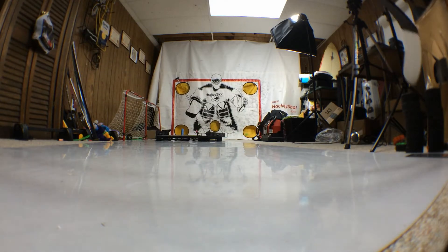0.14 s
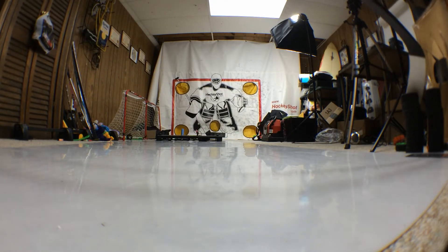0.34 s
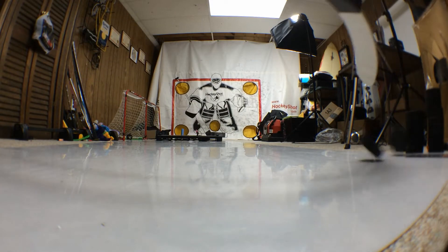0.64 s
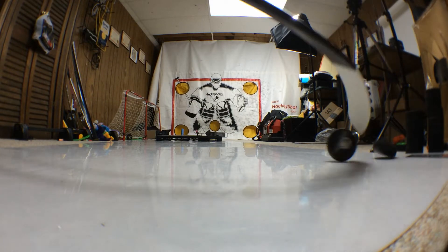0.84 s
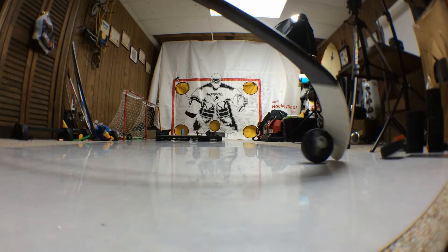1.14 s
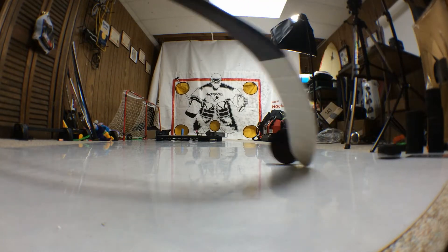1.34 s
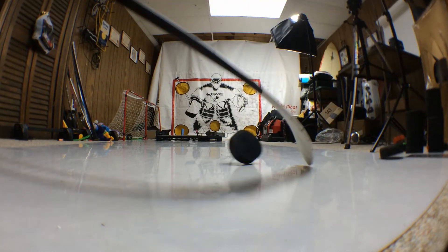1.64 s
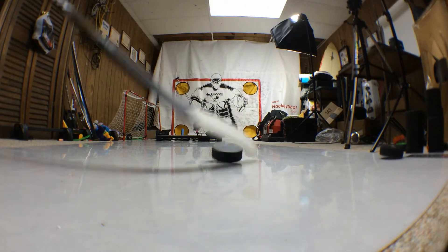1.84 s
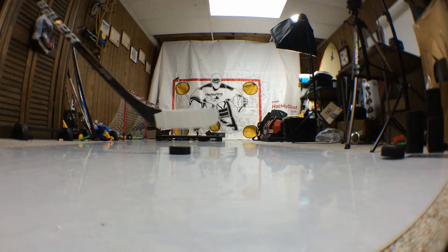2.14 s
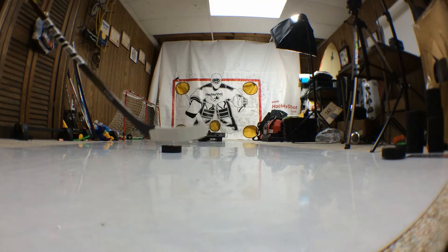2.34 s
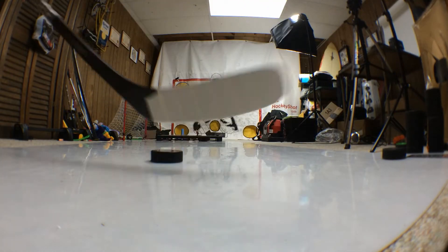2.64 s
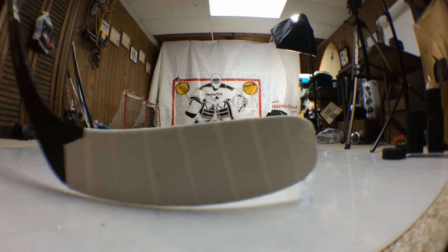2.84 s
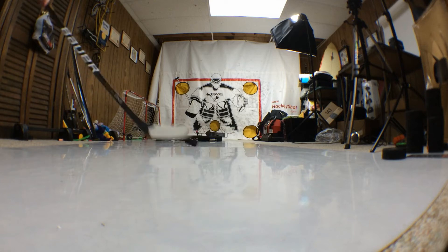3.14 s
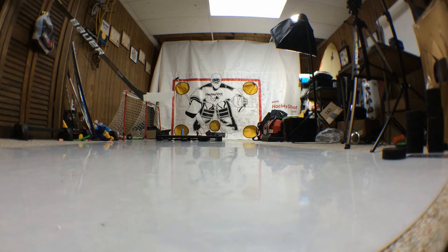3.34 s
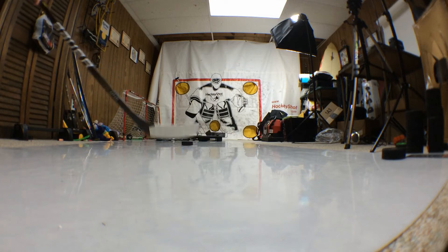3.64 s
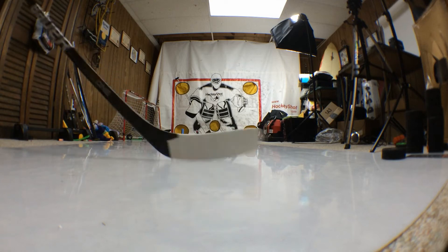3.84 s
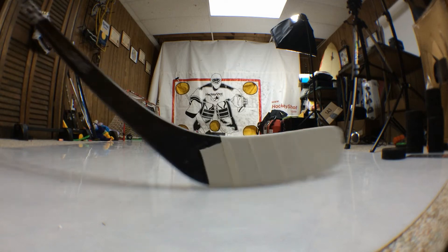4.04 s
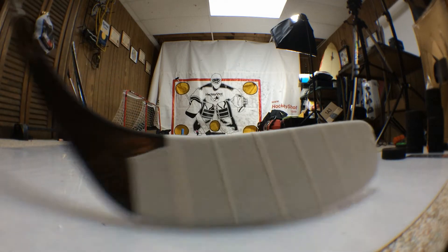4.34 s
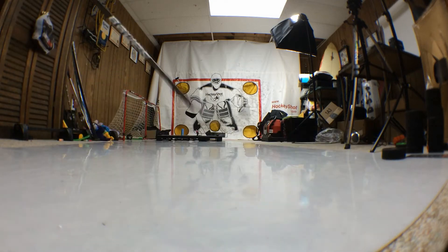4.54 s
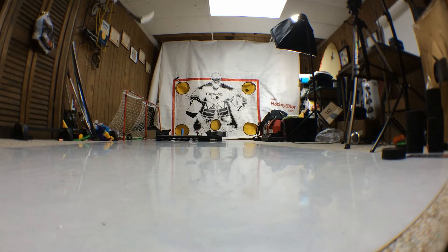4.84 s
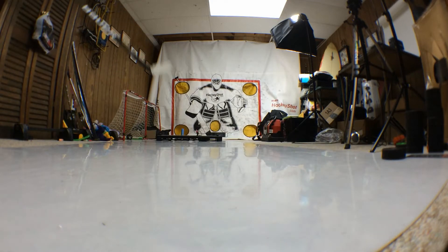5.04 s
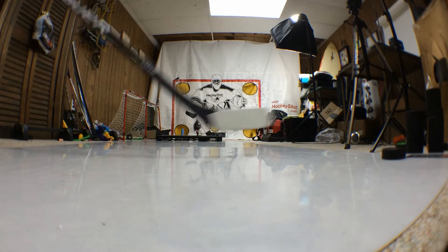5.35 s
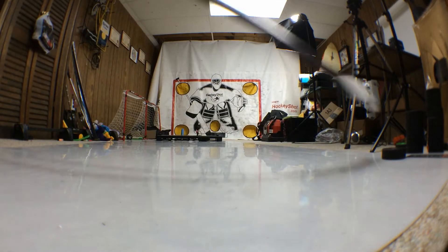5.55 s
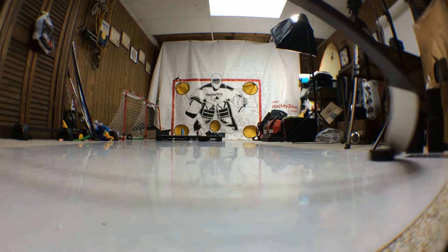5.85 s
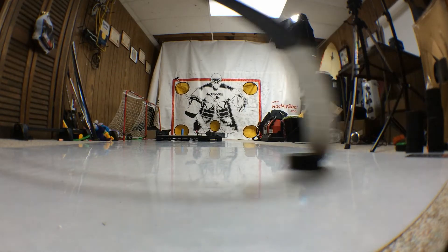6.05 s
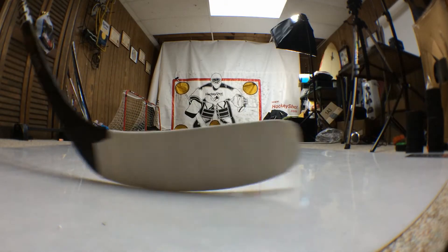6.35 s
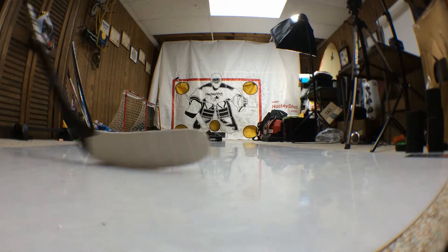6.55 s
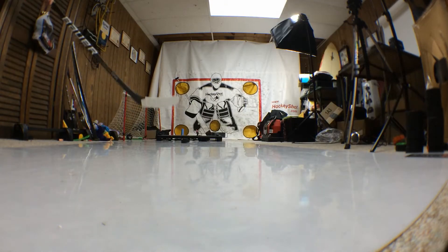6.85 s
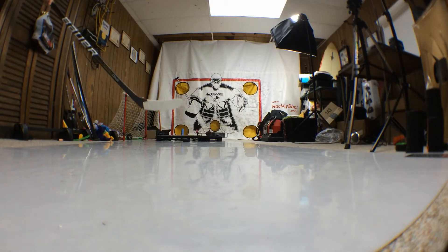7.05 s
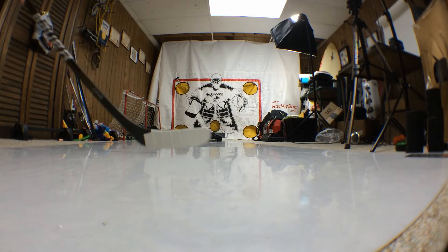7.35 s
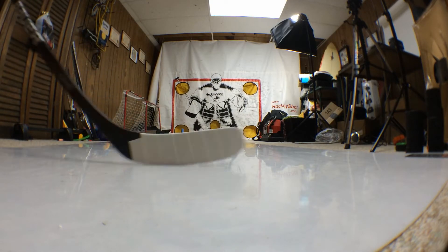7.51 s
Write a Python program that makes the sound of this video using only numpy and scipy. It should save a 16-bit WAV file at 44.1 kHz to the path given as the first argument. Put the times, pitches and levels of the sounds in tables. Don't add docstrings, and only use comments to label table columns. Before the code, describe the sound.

A puck hops in on a hard indoor floor, is tapped and dragged by a stick, then two shots clatter dully into a goal.

```python
import sys
import numpy as np
from scipy import signal
from scipy.fft import rfft, irfft
from scipy.io import wavfile
from scipy.ndimage import uniform_filter1d

SR = 44100
rng = np.random.default_rng(int(sys.argv[2]) if len(sys.argv) > 2 else 0)


def transcribe(u):
    v = np.clip(np.atleast_2d(u).T, -1, 1)
    q = np.round(v * 32767).astype(np.int16)
    wavfile.write(sys.argv[1], SR, q)


def linear_from_db(decibels):
    return 10 ** (np.asarray(decibels, float) / 20)


N = 338688

# f/Hz, density/dB
HISS_SPECTRUM = [(25, -25), (60, 0), (100, -0.5), (200, -0.5), (400, -3), (800, -7), (1400, -9.5),
                 (2200, -16), (3200, -18.5), (5000, -21), (6300, -19), (8000, -22), (10000, -24),
                 (12500, -28.5)]
HISS_DB = -71.5
CLOCK_PERIOD_S, CLOCK_START_S, CLOCK_DB = 0.1024, 0.0558, -66
CASE_HZ = 2300
ROOM_T60_S, ROOM_DB = 0.42, -27

# f/Hz, density/dB
AIR_SPECTRUM = [(1200, 3), (1800, 5), (2300, -4), (3000, -15.5), (4000, -20.5), (5500, -26), (7000, -26.5),
                (9000, -33), (12500, -52)]
# t/s, peak level/dB, t60/s
AIR_CRACKS = [(0.6295, -48.5, 0.22), (0.6774, -52, 0.18), (0.775, -66, 0.1), (0.8225, -56, 0.037),
              (1.081, -49, 0.044), (1.29, -57, 0.17), (1.893, -60, 0.4), (2.419, -49, 0.16),
              (2.824, -41.5, 0.013), (2.9706, -34, 0.17), (3.142, -63, 0.064), (4.1204, -40.5, 0.08),
              (4.5402, -85, 0.11), (4.78, -73, 0.11), (4.789, -61, 0.11), (5.4, -58, 0.14),
              (5.7782, -43, 0.15), (6.2852, -48, 0.032), (6.49, -51, 0.063)]
# t/s, level/dB, hold/s, t60/s
EDGE_SNAPS = [(0.254, -77, .002, .03), (0.626, -74, .002, 0.018), (.676, -74, .002, .02),
              (.8212, -69, 0.0019, .02), (2.823, -65.5, .001, 0.019), (2.973, -72, 0.0011, 0.023),
              (3.414, -77.5, .002, .04), (5.4, -72, 0.021, 0.059), (5.777, -64, 0.00081, .02),
              (6.295, -69, .001, 0.019), (7.003, -75.5, 0.01, .05)]
# f/Hz, density/dB
SNAP_SPECTRUM = [(2000, -31), (3500, 0), (4500, 1.5), (8500, -5), (11000, -20)]

# t/s, level/dB, hold/s, t60/s, air leak level/dB
RATTLES = [(0, -72, 0.017, .1, -10), (0.255, -77, .02, .1, -12), (3.351, -63, .006, 0.046, -29),
           (3.364, -42, 0.014, 0.17, -27), (3.462, -71.5, 0.06, 0.3, -9), (3.409, -47.5, 0.044, 0.1, -17),
           (4.514, -63, .004, 0.072, -38), (4.546, -57.5, 0.0029, 0.2, -19),
           (4.778, -34.5, 0.015, 0.17, -24.5), (5.396, -55, 0.022, 0.12, -19.5),
           (6.985, -65, 0.033, 0.12, -18), (7.043, -69.5, 0.025, 0.16, -7.5),
           (0.675, -55, 0.0091, 0.1, -36), (1.28, -54, 0.014, 0.075, -29),
           (1.891, -47.5, 0.0085, 0.088, -33), (2.411, -56, 0.0088, 0.26, -33), (2.983, -50, .01, 0.1, -26),
           (4.13, -54, 0.0088, 0.13, -30), (5.775, -48.5, .01, 0.12, -30.5), (6.487, -54, 0.008, 0.17, -29)]
# f/Hz, density/dB
RATTLE_SPECTRUM = [(400, -26.5), (600, -1), (1000, 10), (1300, 5.5), (1650, 2.5), (2000, -16.5),
                   (2600, -18.5), (3300, -58)]

# t/s, length/s, level/dB, weight as bass level/dB, speed as treble level/dB
STROKES = [(0.62, 0.15, -81, -7, -17), (0.974, 0.57, -63.5, 4.5, -29), (1.54, 0.39, -56.5, -5, -20.5),
           (2.001, 0.48, -55, -3, -24), (2.548, 0.29, -67, -23, -21), (2.95, 0.15, -66, -8, -16.5),
           (3.128, 0.27, -74.5, -1, -13), (3.5, 0.44, -71.5, 4.5, -13), (3.78, 0.68, -65, -36, -10.5),
           (4.479, 0.16, -68, -12.5, -5), (4.801, 0.093, -65.5, 2, -19), (5.02, 0.29, -88.5, 10, 2.5),
           (5.8, .2, -70.5, -17, -10.5), (5.947, 0.52, -61.5, -43.5, -12), (6.52, 0.49, -73.5, -0.5, -13.5),
           (7.07, 0.091, -74, 20, -2.5), (7.204, 0.44, -73, -2.5, -12)]
STROKE_ATTACK_S, STROKE_T60_S = 0.09, 0.2

# t/s, level/dB, f/Hz, swell/s, t60/s
FRAME_RINGS = [(0.247, -50.5, 91.5, 0.017, 0.22), (.64, -38, 65.3, .02, 0.3),
               (0.687, -27.5, 137.5, 0.014, 0.2), (.79, -47, 59.7, 0.023, 0.089),
               (1.409, -40, 63.4, .02, 0.12), (2.822, -16, 70.2, 0.0019, 0.072),
               (2.969, -40, 55.3, 0.038, 0.23), (3.1, -56, 47, 0.065, 0.36),
               (3.469, -46, 135.7, 0.096, 0.87), (3.5, -56.5, 61.6, 0.062, 0.41),
               (4.125, -37.5, 65, 0.025, 0.2), (4.18, -35.5, 136.3, 0.018, 0.18),
               (4.784, -24.5, 65.7, 0.011, 0.17), (4.79, -27.5, 94.5, 0.0066, 0.25),
               (4.785, -17, 205, 0.0034, 0.14), (4.786, -29, 260, 0.0068, 0.16),
               (5.396, -42.5, 276.6, 0.0033, 0.11), (6.494, -22, 554, 0.0036, 0.057),
               (4.782, -15.5, 405, 0.0034, 0.05), (6.29, -32.5, 66, 0.019, 0.16),
               (7.079, -53, 350, .03, 1.9), (7.12, -55, 310, .03, 0.96), (7.48, -67, 572, .03, 1.85),
               (7.15, -52, 133.8, 0.1, 2)]
# t/s, level/dB, f/Hz, swell/s, t60/s
TILE_NOTES = [(0, -47, 285, 0.0024, 0.083), (.257, -65, 2720, .002, 0.043), (.345, -59, 480, .003, 0.081),
              (.483, -70, 2720, 0.0022, 0.046), (.7, -30, 140, .01, 0.16), (.845, -42, 136.3, .01, 0.23),
              (2.84, -37.5, 126.5, .01, 0.37), (2.98, -27, 140, 0.0045, 0.16),
              (2.982, -37, 730, .003, 0.087), (3.383, -28.5, 459, .006, 0.097),
              (3.51, -23.5, 336.6, 0.0077, 0.095), (3.764, -37, 560, 0.003, 0.05),
              (4.1205, -18.5, 262, 0.0034, 0.049), (4.812, -21, 221, .008, 0.12),
              (4.81, -38, 590, .005, 0.093), (4.655, -54, 384.5, 0.015, 0.14),
              (5.395, -45.5, 1171, .002, 0.076), (5.408, -48, 1547, 0.0027, 0.055),
              (5.4, -50, 250, .004, 0.12), (5.7785, -33.5, 1682, .0015, 0.052),
              (5.779, -32, 990, .002, 0.045), (5.786, -24.5, 368, 0.0016, 0.034),
              (5.787, -29.5, 571, 0.0011, 0.054), (5.797, -34, 177.5, .005, 0.09),
              (6.289, -18.5, 551, .002, 0.047), (6.3, -41.5, 137, .008, 0.24),
              (6.986, -31, 401, 0.0053, 0.067), (7.03, -52, 287, .006, 0.086),
              (7.066, -33, 351.3, .008, .12), (7.453, -30.5, 435, 0.0026, 0.034),
              (.632, -26.5, 432, 0.0019, 0.038), (.676, -29, 507, 0.002, .04),
              (.776, -33, 480, 0.0022, 0.037), (3.353, -42, 310, 0.0069, .06),
              (4.126, -39.5, 328, .002, 0.073), (4.19, -50, 568, 0.0083, 0.13),
              (4.779, -24, 1123, 0.0021, 0.066), (4.79, -29.5, 874, .003, .06),
              (3.146, -30.5, 521, 0.0052, 0.07), (2.8235, -19.5, 310, 0.0017, 0.041)]
# t/s, level/dB, f/Hz, swell/s, t60/s
MORE_NOTES = [(.343, -62, 1900, .001, .04), (.431, -59, 950, .001, 0.062), (1.288, -49, 1665, .002, 0.046),
              (1.352, -34, 140, .004, .08), (1.894, -42, 1400, .001, .04), (2.8235, -18, 395, 0.0025, .04),
              (2.824, -37, 1240, .0015, 0.036), (2.83, -30, 100.4, .005, .12),
              (4.794, -23, 306, .005, 0.13), (4.864, -36, 190, 0.0065, 0.091),
              (5.985, -52, 428.6, .008, 0.12), (6.288, -44, 1750, .001, 0.026),
              (6.4925, -27, 1550, .001, 0.024), (6.51, -38, 258, 0.0037, 0.05)]

# f/Hz, level/dB, t60/s
TILE_MODES = [(92, -8.5, 0.029), (109, -8, 0.062), (140, 5, 0.15), (181.5, 2.5, 0.12), (205, -1, 0.21),
              (262, -8, 0.23), (315, -1.5, 0.12), (368, 1, 0.072), (411.3, 0, 0.096), (455.8, -1.5, 0.13),
              (511, 0.5, 0.068), (569.3, 1.5, 0.12), (680, -17, 0.018), (708.5, -5, 0.11),
              (801.4, -5, 0.095), (904.6, 9, 0.016), (1077, 4.5, 0.019), (1144, 2, 0.064),
              (1223, 10, 0.027), (1340, -9, 0.091), (1550, -0.5, 0.042), (1565, -3, 0.07),
              (2073, -22.5, .04), (2100, -18, 0.013), (2690, -30.5, 0.018)]
# f/Hz, level/dB, t60/s
GOAL_MODES = [(150, 9, 0.3), (205, -1.5, 0.26), (256, 5, 0.083), (285, -6, 0.038), (328, 8, 0.21),
              (310, -12, 0.44), (364, 9, 0.038), (442, -6, 0.2), (542, -4.5, 0.086), (694, -42, 0.12),
              (980, -33, 0.044), (1420, 3, 0.044), (1740, 1.5, 0.065)]
GOAL_OTHER_CORNER_HZ = [139.8, 205, 240, 290, 349.6, 310, 377, 439, 560, 694, 980, 1404, 1740]

# t/s, peak level/dB, bass level/dB, treble level/dB
PUCK_CATCHES = [(1.564, -47, -14, -16), (1.64, -48, -22, -32), (1.777, -39, -20, -22),
                (1.925, -40.5, -9, -20), (1.977, -48, -20, -19), (2.08, -39.5, -15, -32),
                (2.156, -41, -15.5, -19), (2.229, -52, -20, -30), (2.291, -36.5, -20, -35),
                (2.311, -45, -27, -19), (2.398, -40, -22, -30), (2.446, -36.5, -4.5, -22),
                (2.526, -55.5, -4, -16), (3.796, -39.5, -21.5, -25.5), (3.866, -46, -22, -25),
                (4.027, -55, -27, -15), (4.066, -67.5, -20, -21), (4.089, -60, -19.5, -20),
                (4.19, -52, -27, -25), (4.251, -45, -31, -22), (4.61, -60, -20, -13.5),
                (4.66, -65, -19, -27), (2.986, -31, -5.5, -25), (3.004, -34, -1.5, -7),
                (6.515, -43, -9, -16), (1.351, -30.5, -9, -32), (2.6, -57, -25, -27),
                (2.648, -60, -21.5, -28), (2.698, -48.5, -30, -27), (2.757, -52, -24.5, -27),
                (6.2, -48, -31.5, -18)]
# t/s, peak level/dB, bass level/dB, treble level/dB, ring stretch/ratio
PUCK_IN_GOAL = [(3.314, -52, -9, -18, 1.9), (3.363, -18, -28, -26, 0.26), (3.378, -27, -21.5, -31, 1.2),
                (3.411, -26.5, -30, -9, 0.37), (3.425, -20, -18.5, -25, 0.46),
                (3.443, -26.5, -39, -14, 0.72), (3.469, -31.5, -7, -34, 0.99),
                (3.511, -38.5, -7, -34.5, 1.3), (3.578, -48, -5, -12, 1.7), (6.75, -54, -19, -34.5, 1.3),
                (6.803, -54.5, -16, -10.5, 2), (6.905, -56.5, -12.5, -23, 1.4),
                (6.992, -36, -9.5, -13, 0.67), (7.031, -38, -8, -32, 1.9), (7.065, -33.5, -6.5, -39, 0.8),
                (7.077, -31, -15, -22.5, 1.1), (7.098, -40, -3, -22.5, 0.5), (7.14, -49.5, -5, -38, 0.38),
                (7.165, -49.5, -11, -16.5, 1.7)]
# t/s, peak level/dB, bass level/dB, treble level/dB
PUCK_HOPS = [(0.634, -14, -12, -20.5), (0.681, -16, -12.5, -17), (0.7795, -16.5, -15.5, -27),
             (0.8255, -21, -7, -16), (0.934, -38, -12, -20.5), (0.972, -29.5, -18, -29.5),
             (1.036, -34, -17, -21), (1.081, -22.5, -12.5, -15), (1.117, -31.5, -14, -28),
             (1.174, -63, -11, -34), (1.245, -38.5, -11, -23), (1.28, -33, -15, -19),
             (1.34, -25.5, -11, -23), (1.4085, -25, -20, -19)]
# t/s, peak level/dB, bass level/dB, treble level/dB
BLADE_NUDGES = [(1.467, -40.5, -11, -22), (1.503, -40, -15, -41), (1.582, -31, -16, -32),
                (1.614, -41, -4, -27), (1.662, -38, -23, -38), (1.706, -32, -29, -21.5),
                (1.753, -37, -7, -48), (1.84, -39, -27, -52), (1.896, -28, -16.5, -12.5),
                (1.996, -27, -8, -29), (2.05, -35.5, -14, -26), (2.114, -40, -10, -23),
                (2.206, -38, -27, -43), (2.278, -42, -52, -40), (2.338, -39, -28, -29),
                (2.37, -48, -15, -13), (2.417, -26.5, -12.5, -4.5), (2.481, -31, -16, -27)]
# t/s, peak level/dB, bass level/dB, treble level/dB
SHOT_BLOWS = [(2.8245, -15, -10, -14), (2.893, -26.5, -20, -23.5), (3.148, -30.5, -19.5, -18.5),
              (3.762, -29, -21, -14), (3.836, -45.5, -12.5, -24.5), (3.892, -28.5, -17.5, -26.5),
              (3.996, -47, -42, -7), (4.152, -27, -16, -30), (4.316, -71, -26, -27),
              (4.379, -56, -31.5, -5), (4.434, -50, -19.5, -15), (4.473, -51, 1, -12),
              (4.517, -47.5, -15.5, -3.5), (4.794, -27.5, 3.5, -13), (4.819, -26.5, 1, -22)]
# t/s, peak level/dB, bass level/dB, treble level/dB
DRAG_BLOWS = [(5.995, -43.5, -44.5, -20), (6.024, -50, -19, -18), (6.06, -41.5, -26, -18.5),
              (6.148, -46, -36, -16), (6.196, -50, -23.5, -15), (6.229, -35.5, -29, -14),
              (6.259, -53.5, -1, -2), (6.287, -13, -13.5, -15), (6.358, -47.5, -9, -23),
              (6.391, -55, -24, -11), (6.414, -39.5, -39, -15), (6.453, -40.5, -33, -17.5),
              (6.706, -29.5, -23.5, -19.5), (7.452, -36, -15.5, -34)]
# t/s, peak level/dB, bass level/dB, treble level/dB, travel at 500 Hz/ms
CLOSE_SLAPS = [(0, -57, -7, -3, 2.4), (0.253, -57, 5, -11, 6.2), (0.3409, -54, -6, -3.5, 1.3),
               (0.429, -62, 1.5, 6, 1.8), (.462, -57.5, -26, -1, 2.3), (2.968, -14, -21.5, -0.5, 1.58),
               (4.118, -21, -9.5, -1.5, 1.25), (4.538, -43, -7.5, 4.5, 2.1),
               (4.777, -25, -6.5, -14.5, 1.66), (4.784, -19.5, 3.5, -14, 4.4), (5.396, -53, 5, 4, 1.07),
               (5.779, -45, -10, 6.5, 2.16), (6.49, -25.5, -14, 0.5, 1.38)]

HOP_MS, DRIBBLE_MS, SHOT_MS, GOAL_MS, CATCH_MS = 8.15, 7.7, 4.8, 5.88, 4.7
HOP_RING, DRIBBLE_RING, SHOT_RING, SLAP_RING, CATCH_RING = 0.95, 1, 0.7, 0.82, 0.85
HOP_BODY_DB, DRIBBLE_BODY_DB, SHOT_BODY_DB = -1, -2, 4.5
DRAG_BODY_DB, SLAP_BODY_DB, CATCH_BODY_DB = -5.5, 2.5, 0
CHOKE_DB_PER_DB = 0.15


def coloured(points):
    hz, db = np.transpose(points)
    log_hz = np.log(np.fft.rfftfreq(N, 1 / SR) + 1)
    shape = linear_from_db(np.interp(log_hz, np.log(hz), db))
    noise = irfft(rfft(rng.standard_normal(N)) * shape, N)
    return noise / noise.std()


def add(track, s, sound):
    i = max(int(s * SR), 0)
    track[i:i + len(sound)] += sound[:N - i]


def fade(t, t60):
    return np.exp(-np.log(1000) * t / t60)


def bursts(rows, attack, layers):
    out, t = np.zeros(N), np.arange(SR) / SR
    for s, hold, t60, gains in rows:
        i = max(int(s * SR), 0)
        after_hold = np.maximum(t - attack - hold, 0)
        shape = np.minimum(t / attack, 1) * fade(after_hold, max(t60, 0.02))
        noise = np.array(gains) @ layers[:, i:i + SR]
        add(out, s, shape[:N - i] * noise)
    return out


def hiss():
    return linear_from_db(HISS_DB) * coloured(HISS_SPECTRUM)


def clock_ticks():
    pulses = np.zeros(N)
    at = (np.arange(CLOCK_START_S, N / SR, CLOCK_PERIOD_S) * SR).astype(int)
    pulses[at] = linear_from_db(CLOCK_DB + 16 + 2.0 * rng.standard_normal(len(at)))
    band = signal.butter(3, [5800, 10200], "band", fs=SR, output="sos")
    return signal.sosfilt(band, pulses)


def room(x):
    t = np.arange(SR // 2) / SR
    tail = rng.standard_normal(len(t)) * fade(t, ROOM_T60_S) * (t > 0.006)
    tail /= np.sqrt(np.sum(tail ** 2))
    return x + linear_from_db(ROOM_DB) * signal.fftconvolve(x, tail)[:N]


def case_wall(x):
    return signal.sosfilt(signal.butter(3, [75, CASE_HZ], "band", fs=SR, output="sos"), x)


def cracks():
    gate, t = np.zeros(N), np.arange(SR // 4) / SR
    for s, peak_db, t60 in AIR_CRACKS:
        shape = fade(t, 0.024) + 0.21 * fade(t, t60)
        add(gate, s - 0.0005, linear_from_db(peak_db + 2.5) * shape)
    return uniform_filter1d(gate, SR // 700) * coloured(AIR_SPECTRUM)


def snaps():
    rows = [(s, hold, t60, [linear_from_db(db)]) for s, db, hold, t60 in EDGE_SNAPS]
    return bursts(rows, 0.0005, coloured(SNAP_SPECTRUM)[None])


def chatter():
    slow = uniform_filter1d(rng.standard_normal(N), SR // 250) * np.sqrt(SR // 250)
    grain = linear_from_db(2.0 * slow)
    layers = np.array([coloured(RATTLE_SPECTRUM), coloured(AIR_SPECTRUM)])
    rows = [(s, hold, t60, [linear_from_db(db), linear_from_db(db + leak_db + 12.0)])
            for s, db, hold, t60, leak_db in RATTLES]
    return grain * bursts(rows, 0.0018, layers)


def slide():
    chance, size = rng.random((2, N))
    clumps = uniform_filter1d(size - 0.5, SR // 30) * np.sqrt(12 * SR // 30)
    caught = chance < 140 / SR * linear_from_db(4.0 * clumps)
    ticks = caught * linear_from_db(np.minimum(-3.5 * np.log(size + 1e-9), 14))

    t = np.arange(SR // 5) / SR
    hz, db, t60 = np.transpose(TILE_MODES)[:, :, None]
    waves = np.sin(2 * np.pi * (hz * t + rng.random(hz.shape)))
    modes = linear_from_db(db) * (1 - fade(t, 12 / hz)) * fade(t, 0.32 * t60) * waves

    shares = (hz < 230, (hz >= 230) * (hz < 430), (hz >= 430) * (hz < 800), hz >= 800)
    parts = [signal.fftconvolve(ticks, (share * modes).sum(axis=0))[:N] for share in shares]
    layers = np.array([part / part.std() for part in parts])
    rows = []
    for s, length, db, bass_db, treble_db in STROKES:
        tilt_db = np.array([bass_db, 0.41 * bass_db + 0.5, -2.5, treble_db])
        rows.append((s, length - STROKE_ATTACK_S, STROKE_T60_S, linear_from_db(db + tilt_db)))
    return bursts(rows, STROKE_ATTACK_S, layers)


def rings(table):
    out = np.zeros(N)
    for (s, db, hz, swell, t60), (beat, turn) in zip(table, rng.random((len(table), 2))):
        t = np.arange(int(SR * np.clip(t60, 0.02, 1))) / SR
        slow = 0.14 * np.sin(2 * np.pi * ((8 + 10 * beat) * t + turn))
        fast = 0.29 * np.sin(2 * np.pi * (17.0 * t + beat))
        shape = (1 - fade(t, 5 * swell)) * fade(t, t60) * (1 + slow + fast)
        add(out, s, linear_from_db(db - 1.5) * shape * np.sin(2 * np.pi * hz * t))
    return out


def knocks(events, modes, length, scatter_db, detune, moved_hz=None):
    out, t = np.zeros(N), np.arange(int(length * SR)) / SR
    hz, db, t60 = np.transpose(modes)[:, :, None]
    tilt_hz = np.log([172.0, 280.7, 408.0, 480.0, 714.0, 880.0])
    chances = rng.standard_normal((len(events), 3, len(modes), 1))
    for event, (level_chance, pitch_chance, lag_chance) in zip(events, chances):
        s, peak_db, bass_db, treble_db, travel_ms, stretch, body_db = event
        if moved_hz and s > N / SR / 2:
            hz = np.array(moved_hz)[:, None]

        lag = travel_ms / 1000 * (500 / hz) ** 0.5 * linear_from_db(0.66 * lag_chance)
        onset = np.minimum(t / (0.084 * lag + 0.0001), 1)
        swell = np.exp(-(np.maximum(lag - t, 0) / (0.84 * lag)) ** 2) * onset
        after = np.maximum(t - lag, 0)
        ring = t60 * np.clip(stretch, 0.2, 1.6)
        shape = swell * (fade(after, 0.66 * ring) + 0.44 * fade(after, 0.78 * ring))

        tilt_points = [bass_db, 0.3 * bass_db + body_db, body_db, 0, 0, treble_db]
        tilt_db = np.interp(np.log(hz), tilt_hz, tilt_points)
        gains = linear_from_db(db + tilt_db + scatter_db * level_chance)
        waves = np.sin(2 * np.pi * hz * (1 + detune * pitch_chance) * (t - lag))
        blow = linear_from_db(peak_db - 17) * (gains * shape * waves).sum(axis=0)
        blow *= 1 - (t / length) ** 4

        start = s + 0.004 - 0.9 * travel_ms / 1000
        add(out, start, blow)
        for seam in range(4):
            late = 0.004 * 1.7 ** seam * linear_from_db(2.3 * lag_chance[seam, 0])
            echo = np.sign(pitch_chance[seam, 0]) * linear_from_db(-11.5 - 470 * late)
            add(out, start + late, echo * blow)
    return out


def catches():
    events = [(*hit, CATCH_MS, CATCH_RING, CATCH_BODY_DB) for hit in PUCK_CATCHES]
    return knocks(events, TILE_MODES, 0.08, scatter_db=2.5, detune=0.02)


def goal():
    events = [(*hit, GOAL_MS, ring, 0) for *hit, ring in PUCK_IN_GOAL]
    return knocks(events, GOAL_MODES, 0.22, scatter_db=1.5, detune=0.01, moved_hz=GOAL_OTHER_CORNER_HZ)


def blows():
    groups = ((PUCK_HOPS, HOP_MS, HOP_RING, HOP_BODY_DB),
              (BLADE_NUDGES, DRIBBLE_MS, DRIBBLE_RING, DRIBBLE_BODY_DB),
              (SHOT_BLOWS, SHOT_MS, SHOT_RING, SHOT_BODY_DB),
              (DRAG_BLOWS, SHOT_MS, SHOT_RING, DRAG_BODY_DB),
              (CLOSE_SLAPS, None, SLAP_RING, SLAP_BODY_DB))
    events = []
    for rows, group_ms, ring, body_db in groups:
        for s, db, bass_db, treble_db, *own_ms in rows:
            travel_ms = group_ms or own_ms[0]
            stretch = ring * linear_from_db(-CHOKE_DB_PER_DB * (db + 33.0))
            events.append((s, db, bass_db, treble_db, travel_ms, stretch, body_db))
    return knocks(events, TILE_MODES, 0.14, scatter_db=1.8, detune=0.02)


def scene():
    floor = case_wall(slide() + catches() + goal() + blows())
    ringing = rings(FRAME_RINGS) + rings(TILE_NOTES) + rings(MORE_NOTES)
    return room(cracks() + snaps() + chatter() + ringing + floor)[None]


def band_limit(x):
    return signal.sosfilt(signal.butter(12, 12100, fs=SR, output="sos"), x)


def record(dry):
    low_cut = signal.butter(4, 48, "high", fs=SR, output="sos")
    mix = signal.sosfilt(low_cut, dry) + hiss() + clock_ticks()
    return band_limit(mix)


dry = scene()
out = record(dry)
transcribe(out)
```